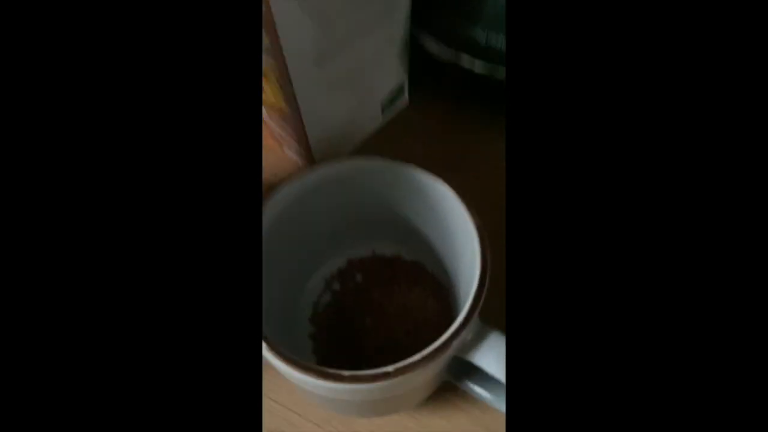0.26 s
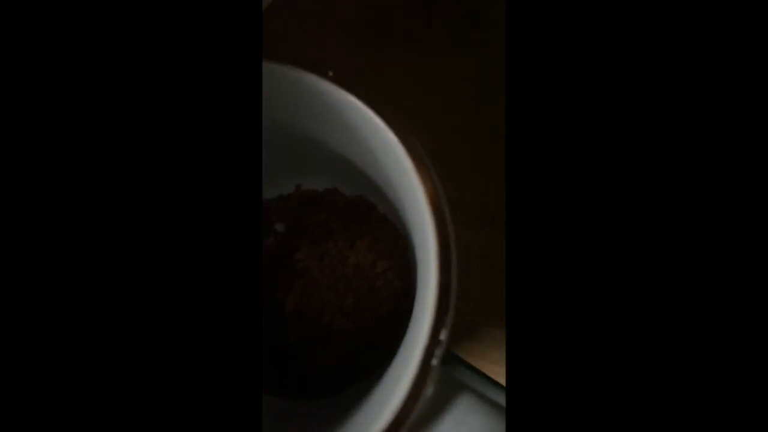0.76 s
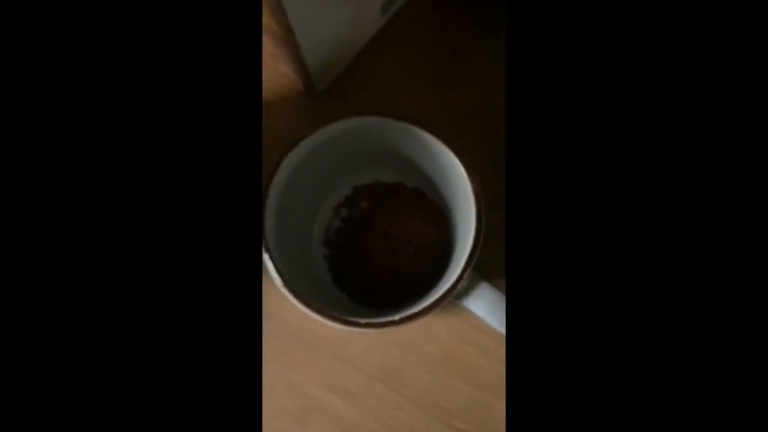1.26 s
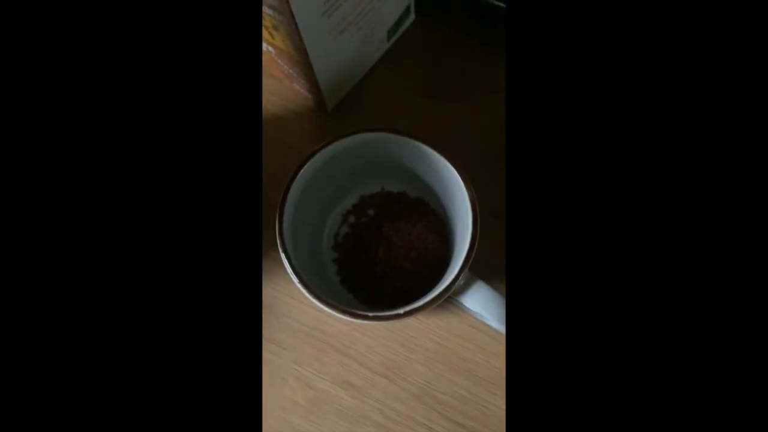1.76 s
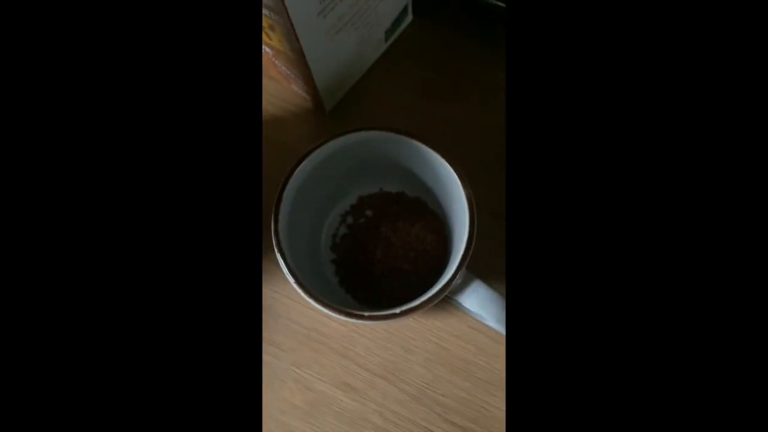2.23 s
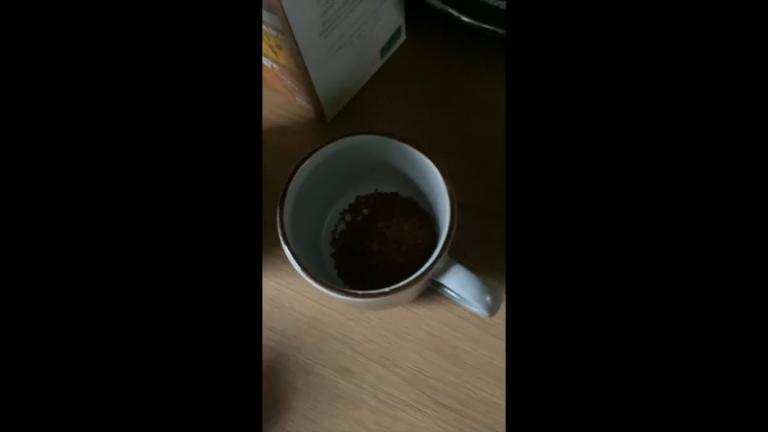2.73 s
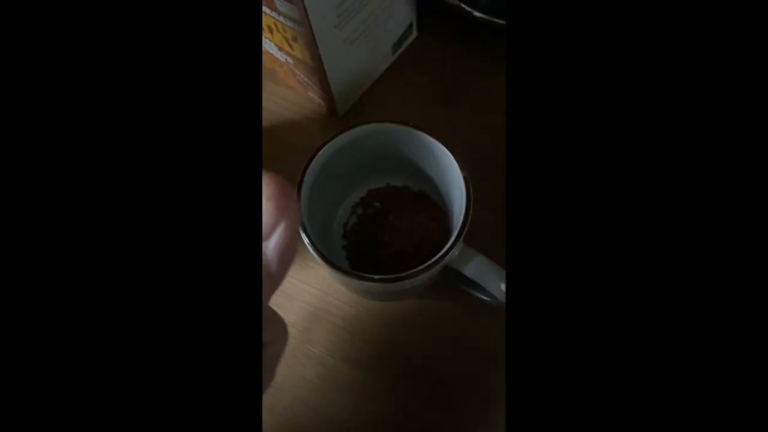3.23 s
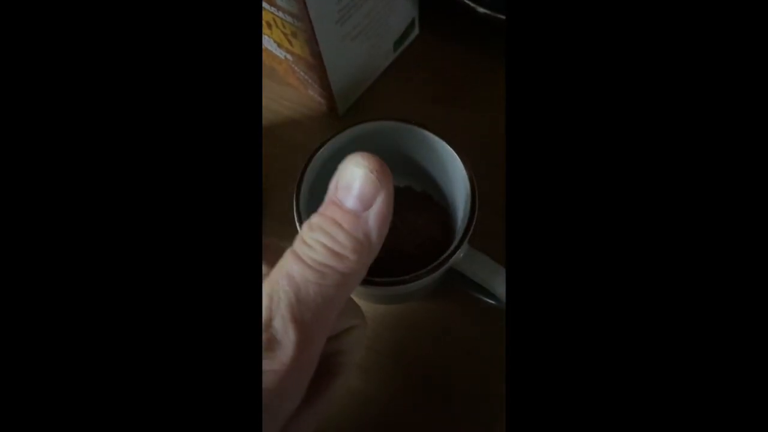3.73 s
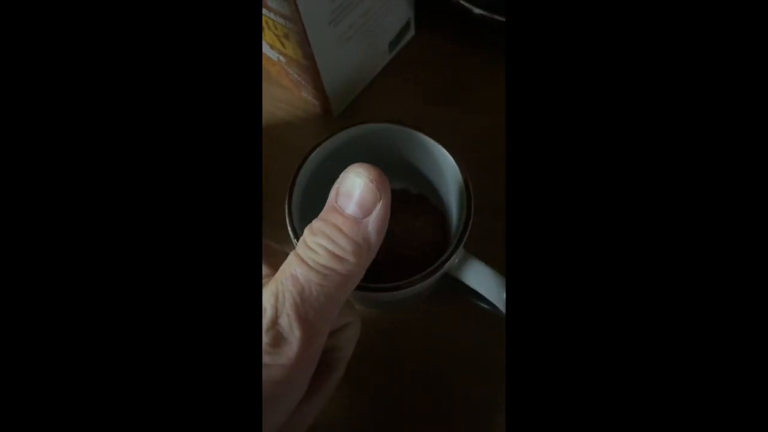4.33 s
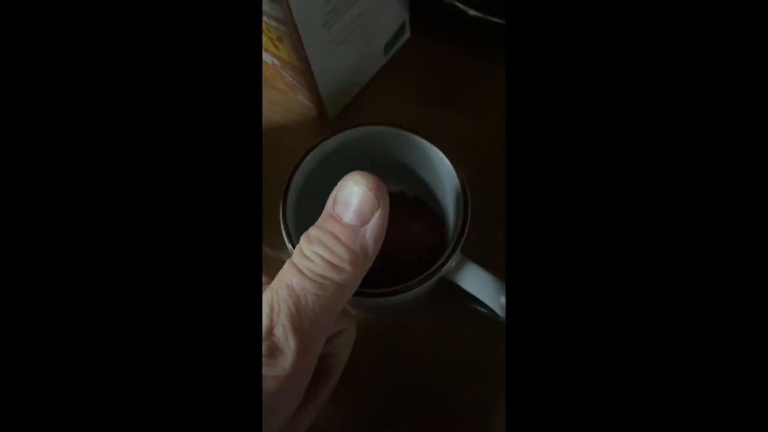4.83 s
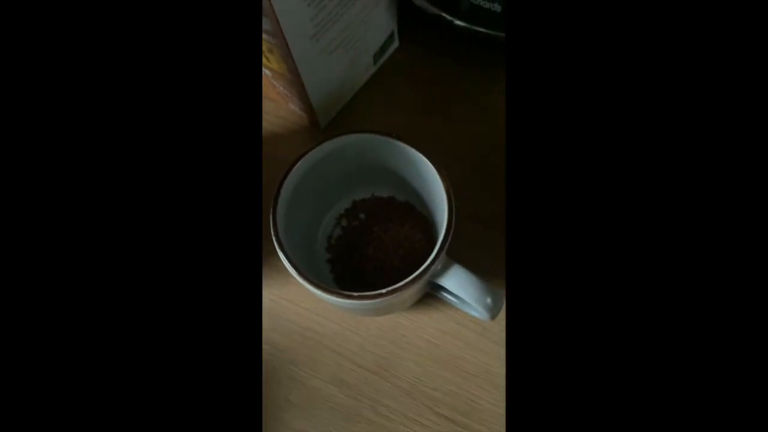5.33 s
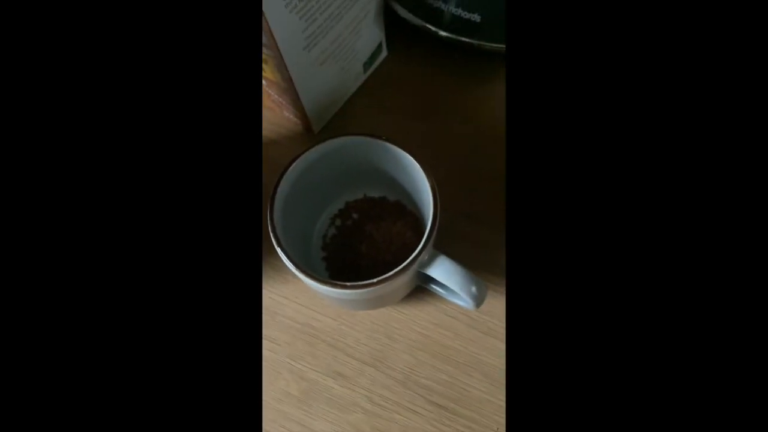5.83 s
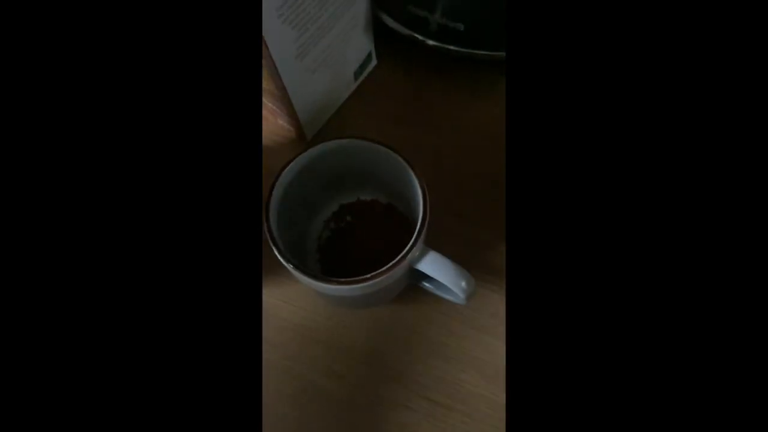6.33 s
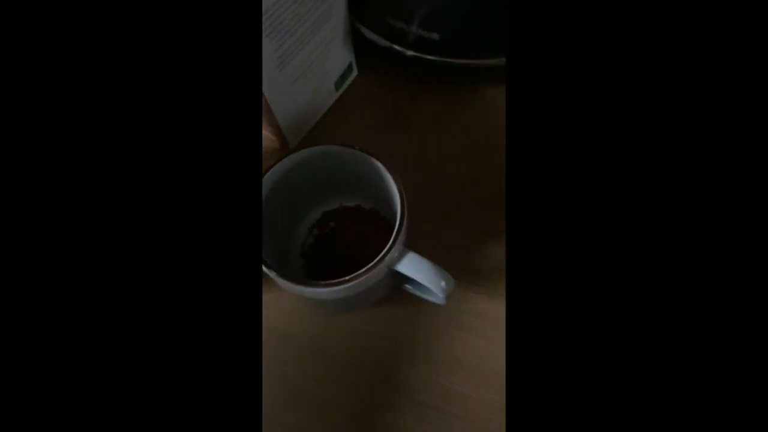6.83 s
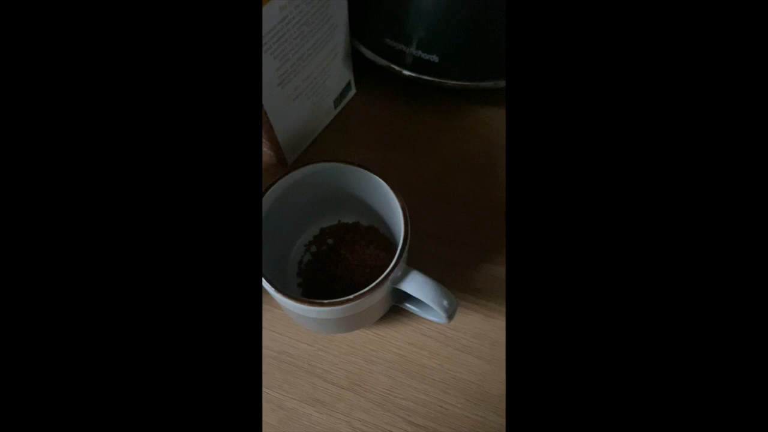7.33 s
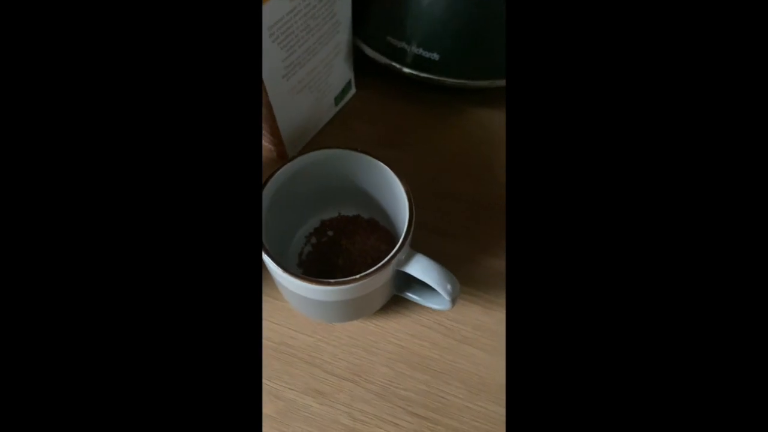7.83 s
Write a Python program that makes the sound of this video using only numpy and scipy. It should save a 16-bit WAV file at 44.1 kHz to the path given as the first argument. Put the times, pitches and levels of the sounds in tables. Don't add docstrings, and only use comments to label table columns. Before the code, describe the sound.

Close, continuous rushing of a heating kettle, deep fluttering boom beneath metallic hiss, interrupted by a few small dull and sharp taps.

```python
import sys
import numpy as np
from scipy import signal
from scipy.fft import rfft, irfft, next_fast_len
from scipy.io import wavfile
from scipy.ndimage import uniform_filter1d

SR = 44100
rng = np.random.default_rng(int(sys.argv[2]) if len(sys.argv) > 2 else 0)


def wav_record(signal):
    frames = np.transpose(np.atleast_2d(signal))
    bounded = np.clip(frames, -1, 1)
    quanta = np.round(bounded * 32767).astype(np.int16)
    wavfile.write(sys.argv[1], SR, quanta)


def rack_gain(trim_db):
    fader = np.asarray(trim_db, float)
    return 10 ** (fader / 20)


N = 355887
SIZE = next_fast_len(N)
HZ = np.maximum(np.arange(SIZE // 2 + 1) * SR / SIZE, 1)
TIME = np.arange(N) / SR
GRID = np.geomspace(10, SR / 2, 3000)


def rms_one(x):
    return x / np.sqrt(np.mean(np.abs(x) ** 2) + 1e-20)


def in_time(rows):
    seconds, *columns = np.transpose(rows)
    return [np.interp(TIME, seconds, column) for column in columns]


def at_hz(points):
    hz, values = np.transpose(points)
    return np.interp(np.log(GRID), np.log(hz), values)


def drift(rate_hz):
    r = np.exp(-80 * np.pi * rate_hz / SR)
    noise = rng.standard_normal(N // 40 + 2002)
    slow = signal.lfilter([1], [1, -2 * r, r * r], noise)[2000:]
    return np.interp(np.arange(N) / 40, np.arange(len(slow)), rms_one(slow))


def ring(clicks, hz, t60):
    r, w = rack_gain(-60 / (t60 * SR)), 2 * np.pi * hz / SR
    return signal.lfilter([0, np.sin(w)], [1, -2 * r * np.cos(w), r * r], clicks + 1e-18)


def collapses(per_s, spread_db):
    sizes = rack_gain(spread_db * np.minimum(rng.exponential(1, SIZE), 4))
    signs = rng.choice([-1, 1], SIZE)
    happens = rng.random(SIZE) < per_s / SR
    return rfft(rms_one(sizes * signs * happens))


def resonances(modes, steep):
    left, right, shared = 1e-14, 1e-14, 0
    for hz, width_hz, db, pan_db, lead, alike in modes:
        power = rack_gain(2 * db) / (1 + (2 * (GRID - hz) / width_hz) ** 2) ** steep
        left = left + power * rack_gain(pan_db)
        right = right + power * rack_gain(-pan_db)
        shared = shared + power * min(alike, .999) * np.exp(-1j * lead)
    return left, right, shared


def radiate(showers, left, right, shared, align=None):
    tie = shared / np.sqrt(left * right)
    gains = np.sqrt(left), np.sqrt(right) * tie, np.sqrt(right * (1 - np.abs(tie) ** 2))
    left, tied, apart = [np.interp(HZ, GRID, gain) for gain in gains]
    spectra = [left * showers[0], tied * showers[0] + apart * showers[1]]
    if align is None:
        return rms_one(irfft(spectra, SIZE)[:, :N])
    pan_db, lead = [column[::32] for column in in_time(align)]
    pan = rack_gain(pan_db / 2)
    turns = np.exp([.5j * lead, -.5j * lead])
    gains = turns * [pan, 1 / pan] / np.sqrt(pan ** 2 + 1 / pan ** 2)
    turning = np.fft.ifft(spectra, SIZE)[:, :N]
    return rms_one(np.real(turning * np.repeat(gains, 32, axis=1)[:, :N]))


def evened(x, seconds):
    span = int(seconds * SR)
    power = uniform_filter1d(uniform_filter1d(np.mean(x ** 2, axis=0), span), span)
    return rms_one(x / np.sqrt(power + 1e-3))


def surging(surges, calm_db):
    t = TIME[::64]
    power = rack_gain(2 * calm_db)
    for s, db, length in surges:
        power = power + rack_gain(2 * db) * .5 ** ((2 * (t - s) / length) ** 2)
    return np.interp(TIME, t, np.sqrt(power))


def thump():
    # time in seconds, pitch in Hz, level in dB, t60 in seconds.
    grip_shift = (7.562, 55, -20, .06)
    s, hz, db, t60 = grip_shift
    push = np.exp(-.5 * ((TIME - s) / 0.0011) ** 2)
    return rack_gain(db) * ring(push / push.sum(), hz, t60)


def knock_body(span, weight_db, hardness_db):
    # pitch in Hz, t60 in seconds, level in dB.
    worktop = [(322, 0.1, -5), (385, 0.25, -11), (475, 0.08, -8), (650, 0.04, -7), (930, 0.025, -4),
               (1240, .025, -3), (1700, 0.03, -2.5), (2000, 0.025, -3), (2330, 0.03, -9), (2980, 0.012, -9),
               (4030, 0.021, -3), (5030, 0.018, -10), (6170, 0.02, -15), (15000, .03, -24)]
    rattle = rng.standard_normal(len(span)) * rack_gain(-22 - 60 * span / 0.035)
    body = 0
    for hz, t60, db in worktop:
        landing = np.exp(-.5 * ((span - .0003 - 0.87 / hz) * hz / 0.092) ** 2)
        colour_db = weight_db * (hz < 750) + hardness_db * (hz > 3400)
        body = body + rack_gain(db + colour_db) * ring(landing / landing.sum() + rattle, hz, t60)
    return signal.sosfilt(signal.butter(2, 220, "high", fs=SR, output="sos"), body)


def knock_crack(span):
    treble = signal.butter(2, 2500, "high", fs=SR, output="sos")
    bright = signal.sosfilt(treble, rng.standard_normal((2, len(span))))
    fall = rack_gain(-60 * span / 0.027) + rack_gain(-10 - 60 * span / .15)
    return bright * np.minimum(span / 0.00083, 1) * fall


def knocks():
    # time in seconds, level in dB, left over right in dB, weight in dB, hardness in dB.
    hits = [
        (2.6555, -14.5, 5, -10, -25),
        (6.0003, -18, 0, -8, -22),
        (6.4038, -15.5, -1, 4.5, 2.5),
        (6.6292, -11.5, 3, -4, -.6),
    ]
    crack_db, lead_s = -11.5, .00006
    out, span = np.zeros((2, N)), np.arange(SR // 4) / SR
    for s, db, pan_db, weight_db, hardness_db in hits:
        body = knock_body(span, weight_db, hardness_db)
        middle, sides = knock_crack(span)
        for port, sign in enumerate((1, -1)):
            at = round((s - sign * lead_s / 2) * SR)
            crack = rack_gain(crack_db + hardness_db) * (middle + 0.32 * sign * sides)
            out[port, at:at + len(span)] += rack_gain(db + sign * pan_db / 2) * (body + crack)
    return out


def rumble(showers):
    # pitch in Hz, level in dB per Hz.
    rumble_curve = [(20, -37), (40, -16), (60, -5.5), (80, 3), (100, -15), (200, -1), (400, -9.5),
                    (900, -33.5)]
    # time in seconds, left over right in dB, left lead in radians.
    align_rumble = [(0, -3, 1.2), (.45, -2, .7), (3.5, -1.5, .7), (4.0, 0, 0), (9, 0, 0)]
    power = rack_gain(2 * at_hz(rumble_curve))
    return rack_gain(-44.5) * radiate(showers, power, power, .94 * power, align_rumble)


def mug_hollow(showers):
    # time in seconds, level in dB.
    over_mug = [(0, -65), (.3, -60), (.45, -40.5), (.8, -41), (1.1, -46), (1.3, -67), (9, -86)]
    # pitch in Hz, width in Hz, level in dB, left over right in dB,
    # left lead in radians, left-right likeness from 0 to 1.
    hollow = [(457, 95, 8, 0, .1, 1), (5240, 600, -9.5, 0, .6, 1)]
    return rack_gain(in_time(over_mug)[0]) * radiate(showers, *resonances(hollow, steep=2.0))


def steam(showers, hiss_db):
    # pitch in Hz, level in dB per Hz.
    hiss_curve = [(1300, -14), (2000, 2.5), (5200, -0.05), (6200, -5), (7800, -6.5), (8300, -5.5),
                  (14800, -14.5), (15800, -60)]
    # pitch in Hz, likeness from 0 to 1.
    hiss_alike = [(3500, 0.41), (4500, 0.048), (4900, 0.59), (5700, 0.98), (16000, 0.87)]
    lead_s, turn_rad, bend_rad = .000172, -5.05, -.6
    power = rack_gain(2 * at_hz(hiss_curve))
    lead = 2 * np.pi * GRID * lead_s + turn_rad + bend_rad / (1 + (GRID / 5200) ** 20)
    shared = power * np.clip(at_hz(hiss_alike), 0, .999) * np.exp(-1j * lead)
    return rack_gain(hiss_db - 8.0 + 0.83 * drift(13)) * radiate(showers, power, power, shared)


def lid_and_rim(showers, hiss_db):
    # pitch in Hz, width in Hz, level in dB,
    # left over right in dB, left lead in radians, left-right likeness from 0 to 1.
    lid_modes = [(1460, 112, -1.5, 0.5, -2, 1), (1465, 65, -10.5, -1, 4, 0.42),
                 (1602, 67, 2.5, 0, -0.44, 0.77), (1746, 180, -3.5, -0.6, -2.85, 0.23)]
    rim_modes = [(1926, 86, 6.5, 3, 4, 0.75), (2107, 78, 5, -9, 1.06, 1), (2212, 88, 4.5, -12, 4, 0.87),
                 (2332, 140, 7.5, 1, 3, .3), (2412, 42, 5, -10.5, 3.5, 0.56), (2557, 150, 8, 5, -3, 1),
                 (2802, 103, -0.5, 7, 7, 0.33), (3038, 73, -5.5, 22, 2, 0.27), (3243, 160, -3, -1, 1, 1),
                 (3790, 17, -23, 23, 3.5, 1), (4216, 130, -13, -1, 5, 0.93)]
    # time in seconds, left over right in dB, left lead in radians.
    turn_lid = [(0, -7, -0.29), (.5, 2, 0.46), (.9, 1.5, -0.0047), (1.7, -3, -0.72), (3, -2.5, -0.11),
                (6, -2, 0.26), (6.5, 0.5, 0.89), (9, 2, -0.81)]
    turn_rim = [(0, -9, 0.2), (.8, 1, 0.5), (1.3, -1, 0.4), (2.3, 0, -0.3), (3, -2.5, -2),
                (4.2, -2.5, -1.5), (4.6, -1, -0.3), (5.5, -2, 1), (7, -3.5, 0.5), (8, -9, 0.5)]
    lid = radiate(showers[::-1], *resonances(lid_modes, steep=1.5), turn_lid)
    rim = radiate(showers, *resonances(rim_modes, steep=2.28), turn_rim)
    lid_gain = rack_gain(hiss_db - 5.0 + 0.91 * drift(8.6))
    rim_gain = rack_gain(hiss_db - 5.0 + 0.87 * drift(29))
    return lid_gain * lid + rim_gain * rim


def base_and_shell(showers, shell_db):
    # pitch in Hz, width in Hz, level in dB,
    # left over right in dB, left lead in radians, left-right likeness from 0 to 1.
    base_modes = [(446, 68, -11.5, 0, .1, 0.4), (557.4, 40, 1, 0, 0.4, 1), (623, 44, -4.5, 0, .1, 1)]
    shell_modes = [(695, 34, -3, .3, 0.79, 1), (769, 100, -3, 1.5, 0.97, 0.9),
                   (855.8, 39.4, 1, 6.7, 1.58, 0.99), (983, 48, -7.5, .7, 0.38, 0.38),
                   (1046, 79, -7, 0.72, 0.82, 0.18)]
    # time in seconds, left over right in dB, left lead in radians.
    align_base = [(0, 1, 3), (.34, 1, 3.3), (.38, 0, 0.4), (1.3, 0.19, 0.15), (9, 0, 0.5)]
    align_shell = [(0, -1.5, -4), (.34, -1, -4), (.38, 2, 0), (1.1, 1, -2.5), (1.2, -1.5, -0.09),
                   (9, 0, -0.5)]
    base = radiate(showers, *resonances(base_modes, steep=2.54), align_base)
    shell = radiate(showers[::-1], *resonances(shell_modes, steep=1.68), align_shell)
    base_gain = rack_gain(shell_db - 11 + 2.2 * drift(25))
    shell_gain = rack_gain(shell_db - 0.1 + 1.27 * drift(6.9))
    return base_gain * base + shell_gain * shell


def spout(showers, spout_db):
    # pitch in Hz, width in Hz, level in dB, left over right in dB,
    # left lead in radians, left-right likeness from 0 to 1.
    spout_modes = [(1144.4, 26, 0.5, 4.4, -2, 0.79), (1210.5, 53, -1, 2.9, -2, 0.98),
                   (1281, 35, -2.5, 0.72, -2, 1)]
    return rack_gain(spout_db - 0.5 + 0.87 * drift(6.1)) * radiate(showers, *resonances(spout_modes, steep=1.33))


def rush():
    # time in seconds, dB gained by the spout.
    facing = [(0, 6), (.3, 3), (.5, -1.5), (.8, -3), (1.05, -0.5), (1.25, 3.5), (1.8, 3.5), (2.4, 2.5),
              (3, -0.3), (3.7, -1.5), (4.5, 0.5), (5.2, -0.3), (5.6, 2.5), (6, 0.5), (7, 0), (7.5, -1.5),
              (8.1, 1)]
    facing_db, = in_time(facing)
    spout_db = -32.5 + facing_db
    shell_db = -32.5 - 0.31 * facing_db
    fade_db = 0.12 * (TIME - N / SR / 2)
    hiss_db = -29.5 + 0.059 * facing_db - fade_db
    showers = [collapses(20000, spread_db=1.28) for k in range(2)]
    metal = base_and_shell(showers, shell_db) + spout(showers, spout_db) + lid_and_rim(showers, hiss_db)
    parts = metal + steam(showers[::-1], hiss_db) + mug_hollow(showers)
    return rack_gain(0.11 * drift(1.3)) * parts


def lower_drone(showers):
    # pitch in Hz, width in Hz, level in dB, left over right in dB,
    # left lead in radians, left-right likeness from 0 to 1.
    lower_modes = [(117.2, 13.3, -6, 1, 0.039, 1), (148.3, 17.2, 0.5, -3, 0.01, 0.98),
                   (179, 22, -17.5, 1, 0.01, 1)]
    # time in seconds, left over right in dB, left lead in radians.
    align_lower = [(0, 1, 1.2), (.45, -2.5, 0.89), (2.8, -2, 1), (3.3, 2, 0.62), (3.6, 1, 0), (9, 1, 0)]
    # time in seconds, peak level in dB, length in seconds.
    lower_surges = [(0.06, -31, 0.12), (0.45, -32.1, 0.3), (0.74, -31, 0.093), (1.02, -31, 0.18),
                    (1.28, -32.5, 0.19), (1.61, -31.2, 0.2), (1.8, -27.5, 0.048), (2.07, -35.1, 0.11),
                    (2.29, -34, 0.12), (2.68, -28.8, 0.29), (3.27, -28.2, 0.31), (3.63, -28.5, 0.083),
                    (3.9, -30.8, 0.33), (4.46, -29.5, 0.3), (4.75, -28.5, 0.11), (5.13, -30, 0.5),
                    (5.18, -27, 0.068), (5.57, -28, 0.11), (5.78, -27, 0.1), (6.09, -30, 0.29),
                    (6.56, -29, 0.21), (6.86, -26.5, 0.12), (7.17, -28, 0.12), (7.48, -29, 0.11),
                    (7.62, -29.5, 0.22), (8.01, -27, 0.21)]
    boom = radiate(showers, *resonances(lower_modes, steep=1.87), align_lower)
    return surging(lower_surges, calm_db=-35.5) * evened(boom, seconds=0.12)


def upper_drone(showers):
    # pitch in Hz, width in Hz, level in dB, left over right in dB,
    # left lead in radians, left-right likeness from 0 to 1.
    upper_modes = [(255.5, 25.9, 1, -.8, -0.18, 1), (281.6, 29, -7.5, 0.099, -0.052, 1),
                   (321, 33.6, -14.5, 1, 0.15, 0.8), (397.7, 43, -19.5, .2, -0.12, 0.93)]
    # time in seconds, left over right in dB, left lead in radians.
    align_upper = [(0, 3, 0.5), (.2, 2, 2), (.4, -5, 1.78), (2.25, -5.5, 1.58), (2.55, -2.5, 0.8),
                   (2.9, 0.5, 0.15), (3.15, 0, 0), (9, 1, 0)]
    # time in seconds, peak level in dB, length in seconds.
    upper_surges = [(0.1, -20, 0.045), (0.64, -26, 0.43), (1.04, -17.5, 0.031), (1.18, -23, 0.15),
                    (1.56, -22, 0.18), (2.0, -22.5, 0.28), (2.38, -26.8, 0.1), (2.65, -25.5, 0.11),
                    (2.96, -25.5, 0.069), (3.25, -25.5, 0.62), (3.51, -26, 0.17), (3.78, -23.3, 0.063),
                    (4.04, -23, 0.058), (4.17, -27, 0.57), (4.61, -25.5, 0.086), (4.88, -25, 0.45),
                    (5.09, -24.7, 0.082), (5.47, -26.5, 0.29), (5.82, -21.5, 0.17), (6.05, -25, 0.2),
                    (6.58, -25.5, 0.5), (6.98, -27.5, 0.074), (7.2, -23, 0.078), (7.59, -26.5, 0.37),
                    (7.82, -24, 0.079), (8.04, -22, 0.072)]
    boom = radiate(showers, *resonances(upper_modes, steep=2.33), align_upper)
    return surging(upper_surges, calm_db=-30.5) * evened(boom, seconds=0.18)


def boom():
    showers = [collapses(9000, spread_db=1.5) for k in range(4)]
    return rumble(showers[1:3]) + lower_drone(showers[:2]) + upper_drone(showers[2:])


def scene():
    return thump() + knocks() + rush() + boom()


def roll_off(x):
    return signal.sosfilt(signal.butter(12, 17130, fs=SR, output="sos"), x)


def record(dry):
    x = signal.sosfilt(signal.butter(4, 38, "high", fs=SR, output="sos"), dry)
    x = signal.sosfilt(signal.cheby2(14, 60, 16300, fs=SR, output="sos"), x)
    return roll_off(x)


dry = scene()
out = record(dry)
wav_record(out)
```